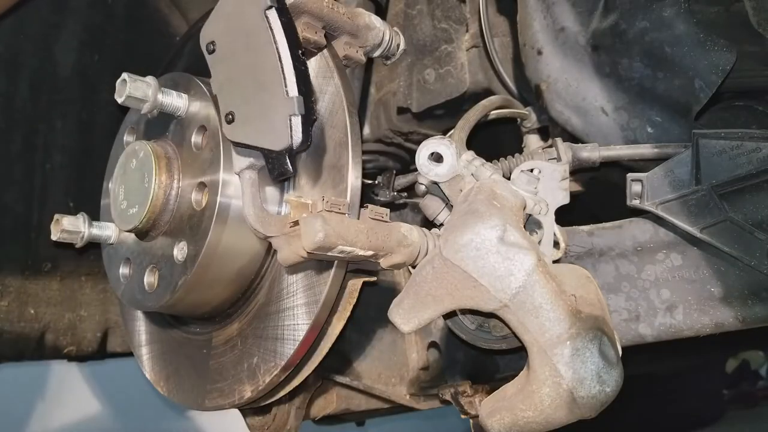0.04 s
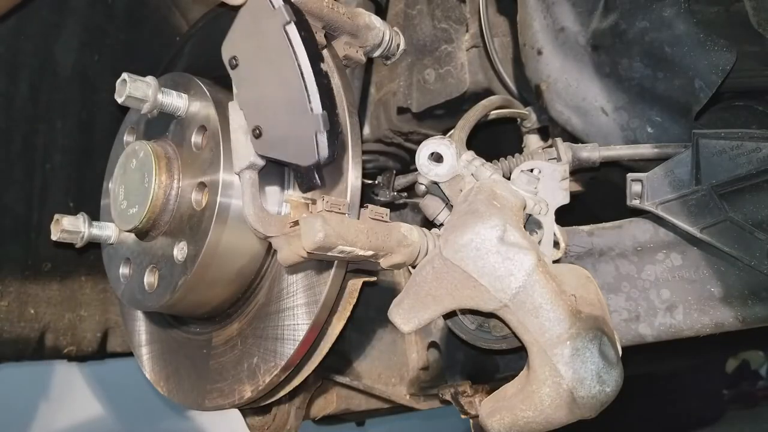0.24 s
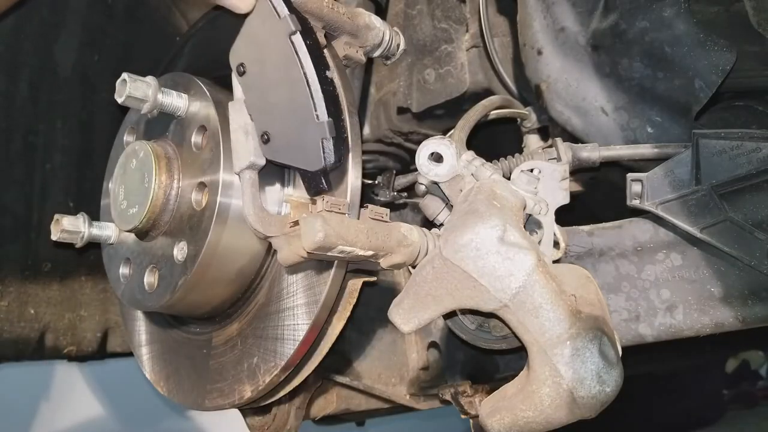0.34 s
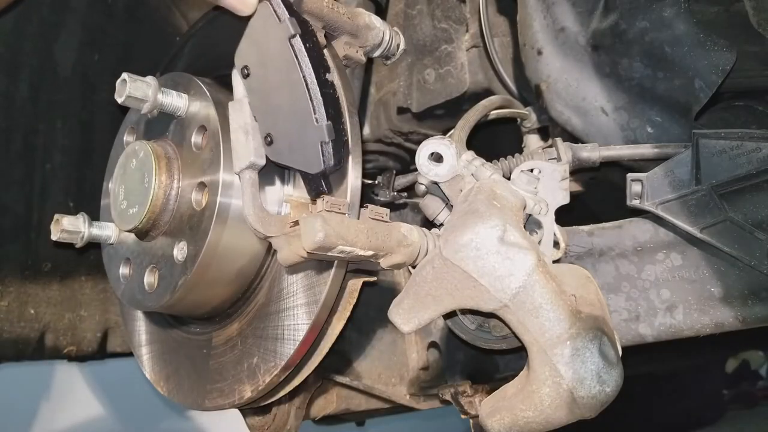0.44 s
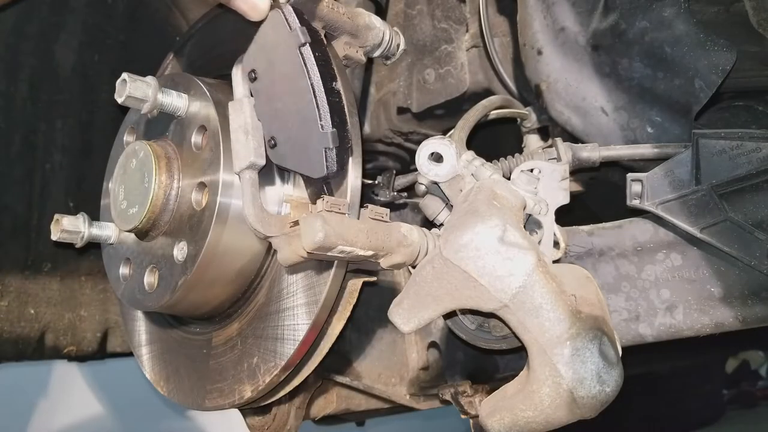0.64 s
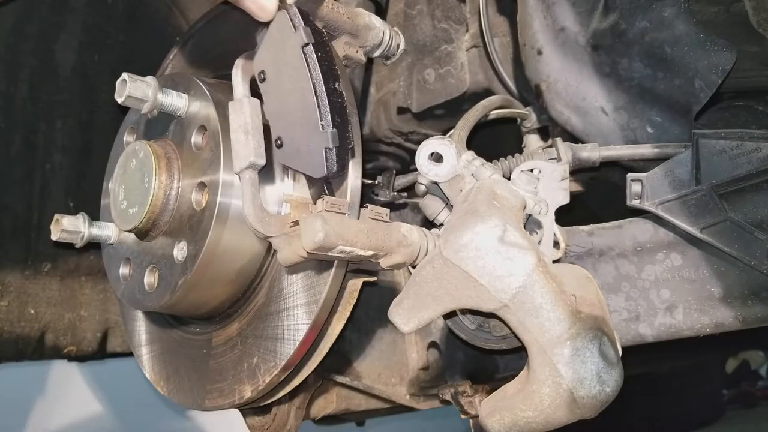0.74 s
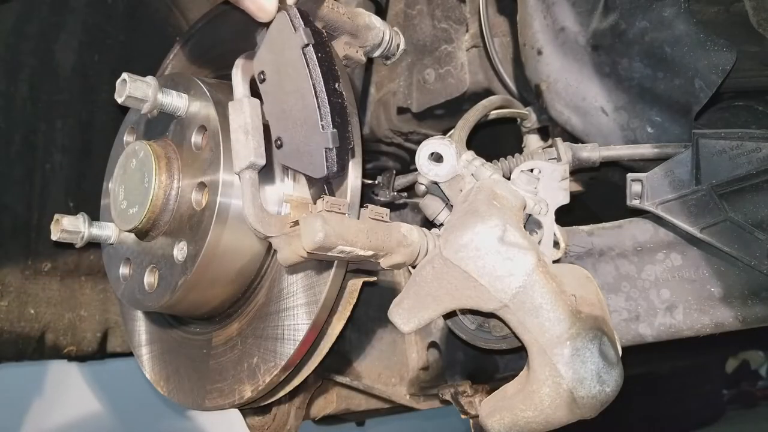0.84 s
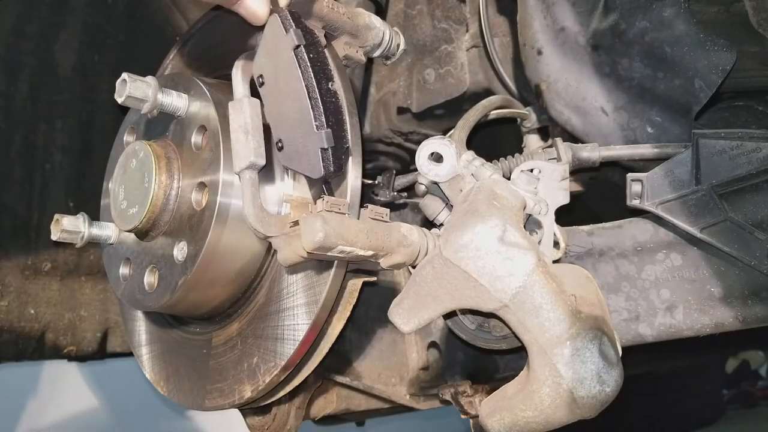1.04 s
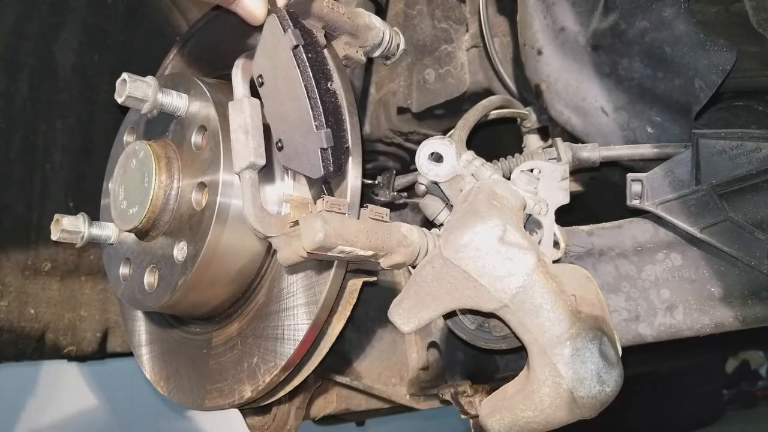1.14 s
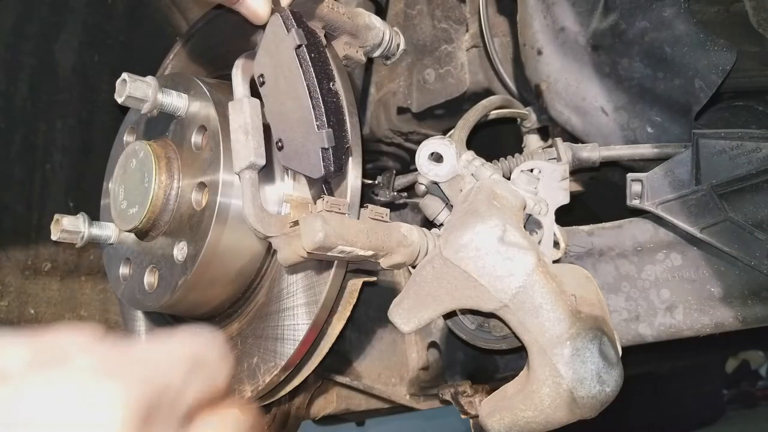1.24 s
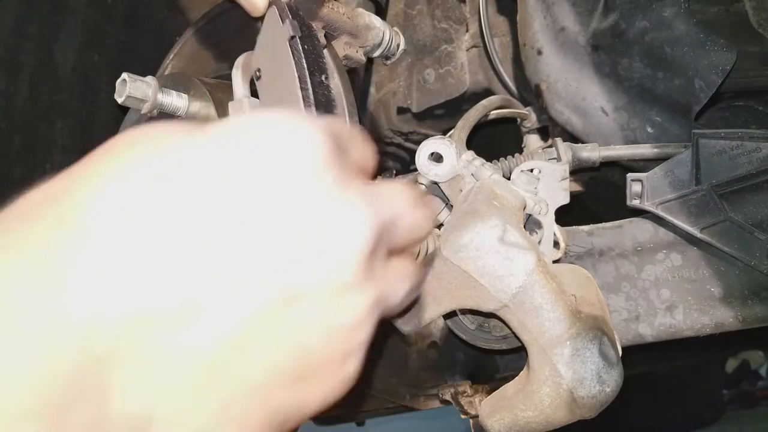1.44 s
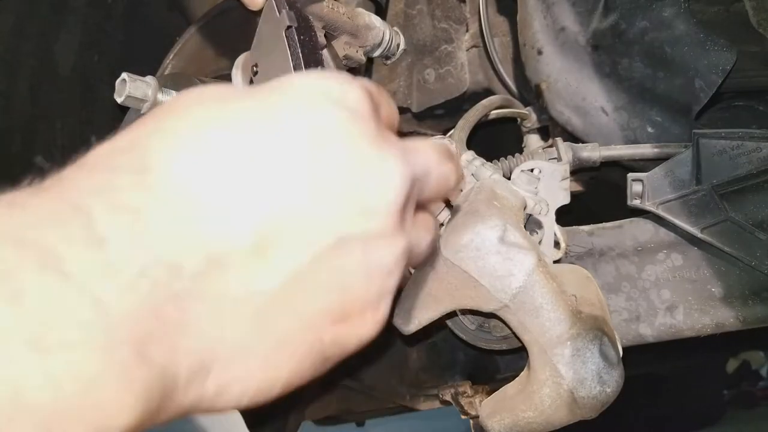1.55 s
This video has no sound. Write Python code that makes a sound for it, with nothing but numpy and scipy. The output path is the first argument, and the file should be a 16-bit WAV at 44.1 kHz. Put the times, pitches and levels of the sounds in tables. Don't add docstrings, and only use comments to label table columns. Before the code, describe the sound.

Close up in a garage, a steel pad clanks and grates against a bracket, thin clips squeak and tick, low thumps answer, cloth rustles at left, and final dull knocks follow over a steady low hum.

```python
import sys
import numpy as np
from scipy import signal
from scipy.fft import rfft, irfft
from scipy.io import wavfile
from scipy.ndimage import uniform_filter1d

SR = 44100
rng = np.random.default_rng(int(sys.argv[2]) if len(sys.argv) > 2 else 0)


def digitize_waveform(pressure):
    field = np.atleast_2d(pressure).T
    bounded = np.clip(field, -1, 1)
    quanta = np.round(bounded * 32767).astype(np.int16)
    wavfile.write(sys.argv[1], SR, quanta)


def decibels_to_gain(level_db):
    exponent = np.asarray(level_db, float) / 20
    return 10 ** exponent


N = 70560
T = np.arange(N) / SR
HALF_SECOND = T[:SR // 2]

# f/Hz, level/dB, t60/s
STEEL_MODES = [(225, -30, .3), (382, -15, .25), (614, -18, .45), (743, -4, .47), (840, -10, .3), (923, -6, .24),
               (958, -8, .4), (1007, -6, .3), (1249, -11, .24), (1669, -21, .6), (1750, -22, .32),
               (1798, -13, .27), (2024, -25, .55), (2230, -26, .17),
               (352, -25, .3), (510, -25, .25), (675, -7, .22), (788, -11, .3), (888, -14, .2), (1047, -17, .3),
        (1346, -17, .3), (1600, -17, .15)]
# f/Hz, level/dB, t60/s
HOLLOW = [(711, 6.5, 0.08), (1006, -3, .07), (838, 0, 0.065), (1612, -13, 0.07), (1364, -14, .05)]
# f/Hz, level/dB, t60/s
PAIR = [(716.5, 0, 2.1), (743.5, 0, 2.1)]
STEEL = STEEL_MODES
BUILD_S, THUD_BUILD_S = 0.0015, 0.0031
METAL_PAN_DB = 3.5
TURN = 1 + 0.51 * rng.standard_normal(40)


def unit(x):
    return x / np.sqrt(np.mean(x ** 2))


def noise(points):
    hz = np.maximum(np.fft.rfftfreq(N, 1 / SR), 1)
    point_hz, point_db = np.array(points).T
    colour = decibels_to_gain(np.interp(np.log(hz), np.log(point_hz), point_db))
    return unit(irfft(rfft(rng.standard_normal((2, N))) * colour, N))


def walk(rate):
    k = int(SR / rate)
    return unit(uniform_filter1d(uniform_filter1d(rng.standard_normal(N), k), k))


def butter(x, order, hz, kind="low"):
    b, a = signal.butter(order, hz, kind, fs=SR)
    return signal.lfilter(b, a, x)


def widen(mid_side, order, hz):
    mid, side = mid_side
    side = butter(side, order, hz, "high")
    return np.array([mid + side, mid - side])


def decay(t, t60):
    return np.exp(-np.log(1000) * t / t60)


def ring(modes, t, turn, build=1e-4, scatter=0):
    hz, db, t60 = np.array(modes).T[:, :, None]
    turn, scatter = np.reshape(turn, (-1, 1)), np.reshape(scatter, (-1, 1))
    sign = (-1.) ** np.arange(len(hz))[:, None]
    fade = sign * decibels_to_gain(db + scatter) * decay(t, t60) * (1 - np.exp(-t / build)) ** 2
    ports = [fade * np.sin(2 * np.pi * hz * t + s * turn * hz / 1000) for s in (.5, -.5)]
    return np.array(ports).sum(1)


def add(out, s, x):
    i = int(s * SR)
    out[:, i:i + x.shape[1]] += x[:, :N - i]


def pan(db):
    return decibels_to_gain(np.array([[db], [-db]]) / 2)


def garage():
    # f/Hz, width/Hz, level/dB
    tones = [(68.4, 3.7, -55.5), (107.42, 7.1, -57)]
    # f/Hz, density/dB per Hz
    floor_colour = [(12, -46.5), (20, -16.5), (96, 1), (485, -34), (738, -25), (849, -35), (1090, -40),
                    (13900, -47.5), (16000, -73)]
    hum = 0
    for hz, width, db in tones:
        b, a = signal.iirpeak(hz, hz / width, SR)
        tone = signal.lfilter(b, a, rng.standard_normal(2 * N))
        tone = signal.lfilter(b, a, tone)[N:]
        hum = hum + decibels_to_gain(db) * unit(tone)
    air = widen(noise(floor_colour), 1, 508)
    return (hum + decibels_to_gain(-58 + 0.99 * walk(17.0)) * air) * pan(0.95)


def beating_disc():
    # t/s, level/dB
    pair_blows = [
        (-.008, -62.5),
        (.2355, -48),
        (1.421, -53),
    ]
    out = np.zeros((2, N))
    for s, db in pair_blows:
        out += decibels_to_gain(db) * ring(PAIR, np.maximum(T - s, 0), TURN[:2], BUILD_S)
    return out * pan(METAL_PAN_DB)


def hollow_note():
    return ring(HOLLOW, HALF_SECOND, TURN[-len(HOLLOW):], BUILD_S)


def chassis():
    # f/Hz, density/dB per Hz
    chassis_colour = [(71, -54.5), (120, -13.5), (369, -8.5), (545, -14), (716, -16), (1460, -11.5),
                      (1650, -18.5), (7000, -48), (9100, -101), (15400, -120)]
    t = HALF_SECOND
    tail = widen(noise(chassis_colour)[:, :len(t)], 1, 700)
    low = butter(tail, 2, 760)
    tail = low * decay(t, 0.55) + (tail - low) * decay(t, 0.32)
    return decibels_to_gain(-14) * tail * (1 - np.exp(-t / BUILD_S))


def sliding_pad(car):
    # t/s, level/dB
    pressure = [(0, -71), (.06, -59), (.12, -89.5), (.22, -85.5), (.3, -69.5), (.45, -35.5), (.55, -74.5),
                (.69, -62), (.76, -79), (.85, -93), (.9, -68.5), (1.0, -70), (1.2, -91), (1.31, -87),
                (1.35, -61.5), (1.5, -59), (1.6, -44)]
    at, db = np.array(pressure).T
    grit = butter(rng.standard_normal(N), 2, [480, 1100], "band")
    grit = grit * decibels_to_gain(np.interp(T, at, db) + 1.5 * walk(62))
    pair = ring(PAIR, HALF_SECOND, TURN[:2], BUILD_S)
    steel = ring(STEEL, HALF_SECOND, TURN[:len(STEEL)], BUILD_S)
    body = 0.62 * hollow_note() + .04 * pair + decibels_to_gain(-25) * (11.0 * car + steel)
    return decibels_to_gain(-25.5) * signal.fftconvolve(body, grit[None], axes=1)[:, :N] * pan(METAL_PAN_DB)


def touches():
    # t/s, level/dB, f/Hz, t60/s
    edge_touches = [(.012, -52, 1013, 0.065), (.05, -45, 872, 0.067), (.06, -50, 1079, 0.049),
                    (.075, -55, 980, 0.091), (.102, -52.5, 970, .06), (.395, -34.5, 766, 0.076),
                    (.44, -57, 674, 0.04), (.533, -30, 717, 0.037), (.607, -40, 679, 0.062),
                    (.69, -65, 864, 0.09), (.735, -51.5, 1005, 0.048), (.749, -49, 1096, 0.052),
                    (.752, -42.5, 600, 0.05), (.772, -57, 1175, 0.067), (.79, -55, 610, 0.082),
                    (.8, -58, 1100, 0.037), (.898, -47, 685, 0.13), (.9, -58, 512, 0.12),
                    (.956, -55, 710, 0.041), (.975, -44, 725, 0.043), (1.343, -59.5, 746, 0.087),
                    (1.374, -39, 720, 0.042), (1.392, -47, 772, 0.046), (1.456, -45, 896, 0.15),
                    (1.493, -38, 818, 0.05), (1.503, -47, 720, 0.14), (1.531, -46, 766, 0.07),
                    (1.539, -45, 1110, 0.049), (1.555, -42, 755, .06), (1.365, -64, 1265, 0.091),
                    (.722, -48, 729, 0.18), (.395, -53, 2375, 0.035), (.237, -32, 2737, 0.091),
                    (1.552, -57, 1004, 0.23), (1.56, -66, 1297, 0.13), (1.573, -65, 730, 0.033)]
    out = np.zeros((2, N))
    for s, db, hz, t60 in edge_touches:
        add(out, s, ring([(hz, db, t60)], HALF_SECOND, TURN[:1], THUD_BUILD_S))
    return out * pan(METAL_PAN_DB)


def scrapes():
    clip_modes = [(6760, 10, 0.0033), (9030, 0, 0.015), (12500, 2, 0.01), (15300, 9, 0.0045)]
    # t/s, length/s, level/dB, squeak f/Hz, squeak level/dB
    slides = [
        (0.027, 0.063, -83.5, 2820, 12),
        (0.23, 0.13, -71, 4970, -16),
        (0.391, 0.035, -73.5, 4960, 1),
        (0.417, 0.062, -72.5, 5530, 0),
        (.432, 0.076, -65, 2810, 2.5),
        (0.564, 0.095, -65, 3535, -9.5),
        (0.702, 0.07, -77.5, 11800, 9.5),
        (0.737, 0.086, -84, 2520, 10),
        (0.926, 0.18, -95, 4730, 20.5),
        (1.409, 0.16, -76.5, 2770, 3.5),
    ]
    out = np.zeros((2, N))
    clicks = rng.standard_normal((2, N)) * decibels_to_gain(2.7 * rng.exponential(1, N))

    def rung(modes):
        return unit(signal.fftconvolve(clicks, ring(modes, T[:3000], 1), axes=1)[:, :N])

    fizz = rung(clip_modes) + 0.75 * unit(np.diff(clicks, prepend=0))
    for s, length, db, hz, squeak_db in slides:
        u = np.maximum(T - s, 0) / length
        swell = np.minimum(u / 0.12, 1) * np.exp(-1.2 * u ** 2)
        squeak = decibels_to_gain(squeak_db) * rung([(hz, 0, .011)])
        out += decibels_to_gain(db) * swell * (fizz + squeak)
    return out * pan(3.2)


def ticks():
    # t/s, peak level/dB, centre f/Hz, t60/s, left-right/dB
    contacts = [(0.1015, -66.5, 12900, 0.03, 9), (0.2874, -57.5, 13500, 0.037, 14),
                (0.364, -66.5, 7500, 0.27, 11), (0.436, -55.5, 8800, 0.04, -8),
                (0.5741, -46, 16300, 0.095, 8), (0.7135, -59, 12300, 0.031, 11),
                (0.9046, -62.5, 11300, 0.095, -4), (1.13, -72, 7300, 0.097, 10.5),
                (1.44, -49, 14800, 0.059, 13), (1.541, -58.5, 10700, 0.078, -5),
                (1.553, -55, 8600, 0.13, 7), (1.5974, -65.5, 8600, 0.04, -21)]
    out, t = np.zeros((2, N)), T[:SR // 8]
    for s, db, hz, t60, lr_db in contacts:
        grain = rng.standard_normal((3, len(t)))
        b, a = signal.iirpeak(min(hz, 16000), 2.2, SR)
        burst = unit(signal.lfilter(b, a, grain[0] + .5 * grain[1:]))
        snap = decibels_to_gain(-5.5) * np.exp(-t / 0.00084)
        shape = (decay(t, t60) + snap) * np.minimum(t / 0.00036, 1)
        add(out, s, decibels_to_gain(db - 8.0) * pan(lr_db) * burst * shape)
    return out


def thuds():
    # t/s, level/dB, f/Hz, t60/s
    low_notes = [(0.23, -47, 238, 0.11), (0.23, -36, 240, 0.13), (0.239, -36, 459, .1),
                 (0.348, -31, 225, 0.088), (0.37, -37, 322, 0.09), (0.36, -35, 470, 0.1),
                 (0.41, -30, 226, 0.029), (.364, -29, 640, 0.021), (0.38, -36, 142, 0.13),
                 (0.429, -35, 211, 0.093), (0.48, -34.5, 350, 0.12), (0.52, -35, 138, 0.075),
                 (0.73, -36.5, 462, 0.032), (0.708, -44, 230, 0.085), (0.75, -36, 102, 0.16),
                 (0.76, -36, 420, 0.029), (0.71, -33.5, 187, 0.057), (0.878, -42, 288, 0.14),
                 (0.92, -47, 182, 0.21), (0.94, -57, 250, 0.28), (.8, -56, 230, 0.28),
                 (1.02, -54, 227, 0.25), (0.95, -44, 107, 0.18), (0.61, -61.5, 400, .15),
                 (1.53, -48.5, 154, 0.14), (1.138, -51.5, 277, 0.096), (1.146, -65, 510, 0.16),
                 (1.428, -52.5, 226.7, 0.56), (1.437, -42.5, 114, 0.23), (1.587, -40, 234, 0.2),
                 (1.425, -46, 382, .8)]
    out = np.zeros((2, N))
    for s, db, hz, t60 in low_notes:
        modes = [(hz, db, t60), (1.09 * hz, db - 21.5, t60)]
        add(out, s, ring(modes, HALF_SECOND, 1.5, THUD_BUILD_S))
    return out * pan(2.5)


def knocks(car):
    # t/s, level/dB, contact/ms, share of long ring/dB
    blows = [(.232, -37, 0.052, 6.5), (.2355, -7.5, 0.22, -4), (.243, -25, 0.079, -18.5),
             (.251, -30.5, 0.045, 2), (.345, -34.5, 1.18, 12), (.474, -29, 0.6, -47),
             (.478, -9.5, 1.95, -8.5), (.497, -23.5, 1.25, -25), (.575, -37.5, 0.087, -11),
             (.72, -46, 0.63, -11), (.748, -47, 0.65, -2.5), (.879, -46, 1.35, -7.5),
             (1.421, -18.5, 1.8, -8.5), (1.44, -23, 2, -57), (1.456, -17, 2.52, -11),
             (1.535, -63, 0.76, 16), (1.556, -45, 0.76, -36), (1.593, -26, 1.4, 7.5)]
    out, hollow = np.zeros((2, N)), hollow_note()
    for s, db, ms, long_db in blows:
        u = T[:400] / (ms * .0001)
        push = u ** 3 * np.exp(-u)
        scatter = -0.5 * rng.standard_normal(len(STEEL))
        steel = ring(STEEL, HALF_SECOND, TURN[:len(STEEL)], BUILD_S, scatter)
        body = hollow + decibels_to_gain(long_db) * (car + steel)
        add(out, s, decibels_to_gain(db - 9) * signal.fftconvolve(body, push[None] / push.sum()))
    return out * pan(METAL_PAN_DB)


def sleeve():
    # t/s, rise/s, hold/s, fall/s, level/dB
    strokes = [
        (0.894, 0.033, 0.12, 0.1, -72.5),
        (1.256, 0.1, 0.099, 0.1, -65.5),
    ]
    # f/Hz, density/dB per Hz
    cloth_colour = [(1470, -40), (2500, -17), (3890, -19), (5560, -9.5), (7300, -3), (8600, -8),
                    (12600, -3), (16000, -4)]
    shape = 0
    for s, rise, hold, fall, db in strokes:
        corners = np.cumsum([s - .01, .01, rise, hold, fall, .03])
        swell_db = np.interp(T, corners, [-69.0, -15, -5, -6.5, -20.5, -46.0])
        shape = shape + decibels_to_gain(swell_db + db)
    return 2.76 * shape * decibels_to_gain(1.3 * walk(40)) * noise(cloth_colour) * pan(13)


def room(x):
    t, t60 = T[:SR], 0.81
    echoes = widen(rng.standard_normal((2, SR)), 2, 250)
    dull = butter(echoes, 2, 1429)
    tail = dull * decay(t, t60) + (echoes - dull) * decay(t, 0.65 * t60)
    tail = tail * (t > .012)
    return decibels_to_gain(-13) * signal.fftconvolve(x, tail * np.sqrt(10 / SR), axes=1)[:, :N]


def scene():
    car = chassis()
    metal = beating_disc() + sliding_pad(car) + touches() + knocks(car)
    low, small = thuds(), scrapes() + ticks()
    wet = room(metal + .4 * low + 0.59 * small)
    return garage() + metal + low + small + sleeve() + wet


def band_limit(x):
    return signal.sosfilt(signal.butter(12, 16500, fs=SR, output="sos"), x)


def record(dry):
    top_cut = signal.ellip(8, .2, 50, 15950, fs=SR, output="sos")
    mix = signal.sosfilt(top_cut, dry)
    return band_limit(mix)


dry = scene()
out = record(dry)
digitize_waveform(out)
```